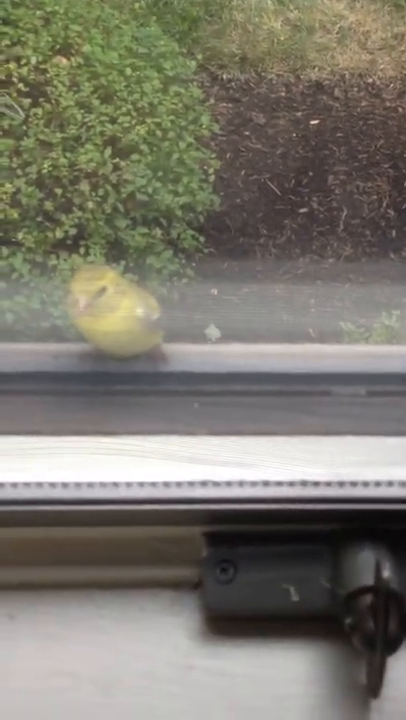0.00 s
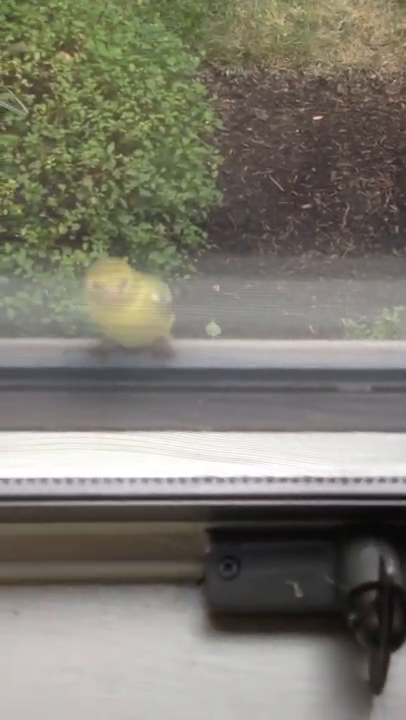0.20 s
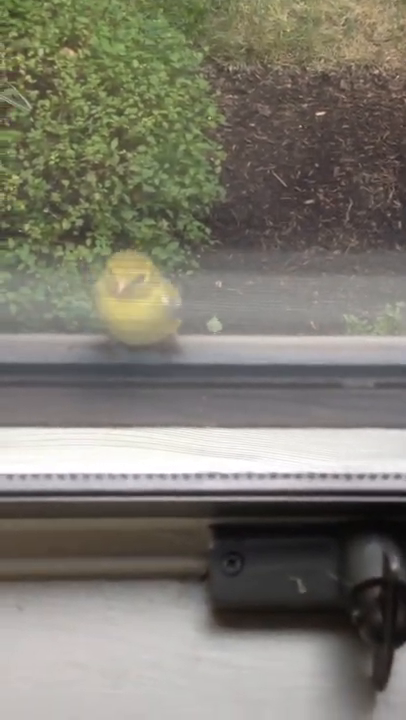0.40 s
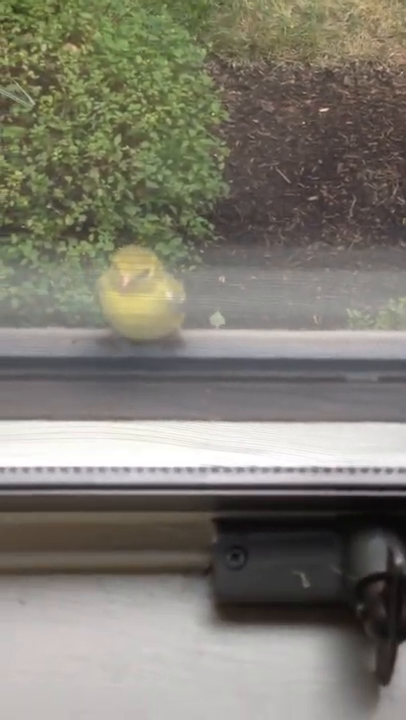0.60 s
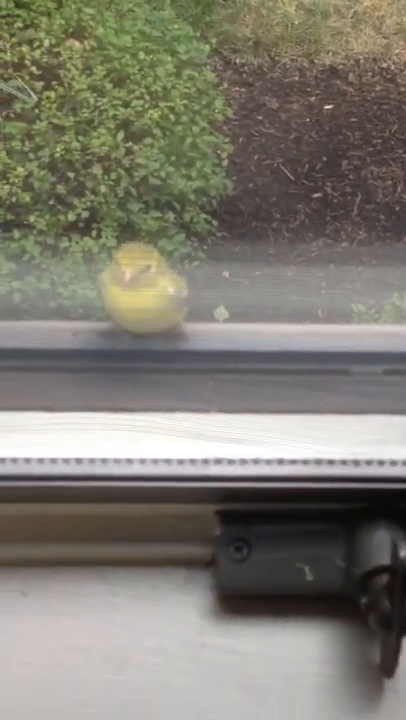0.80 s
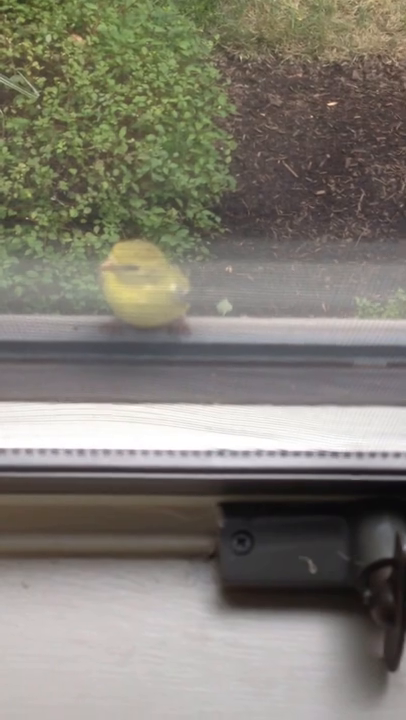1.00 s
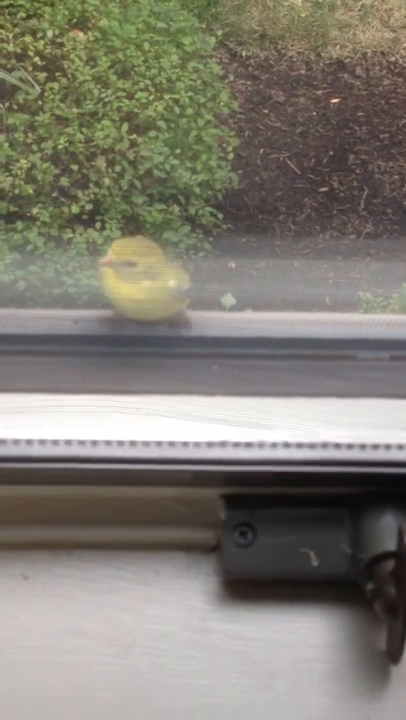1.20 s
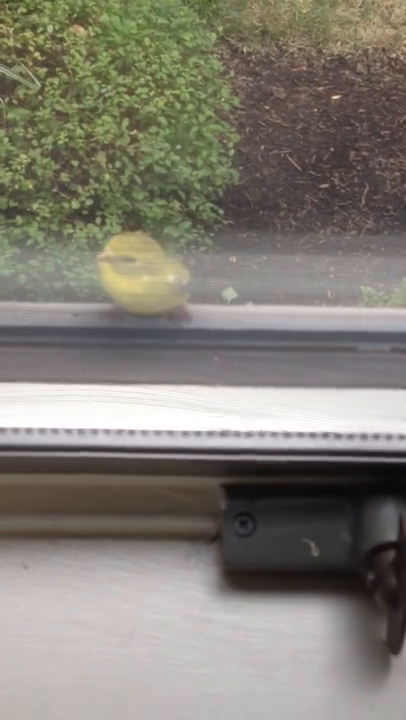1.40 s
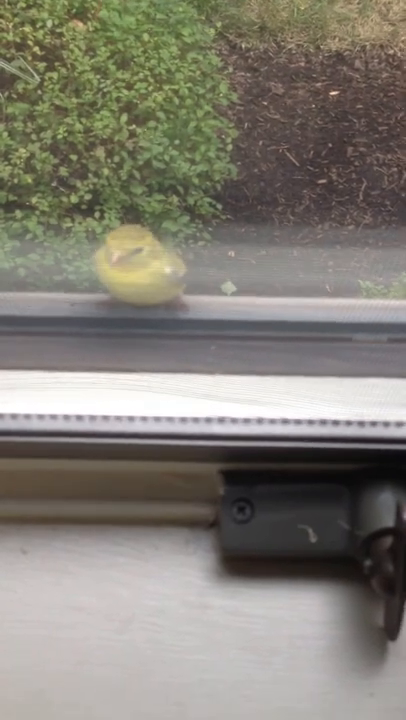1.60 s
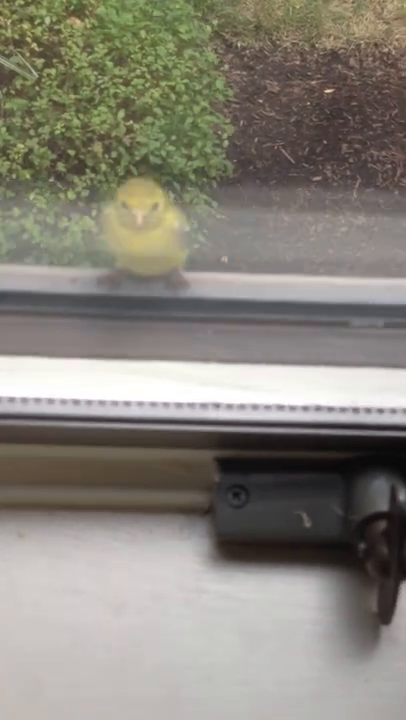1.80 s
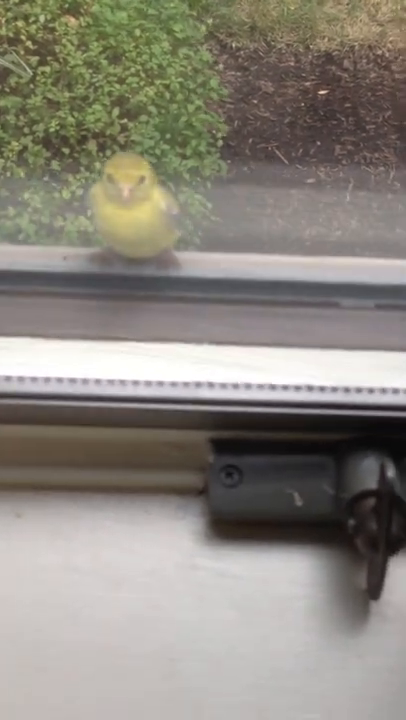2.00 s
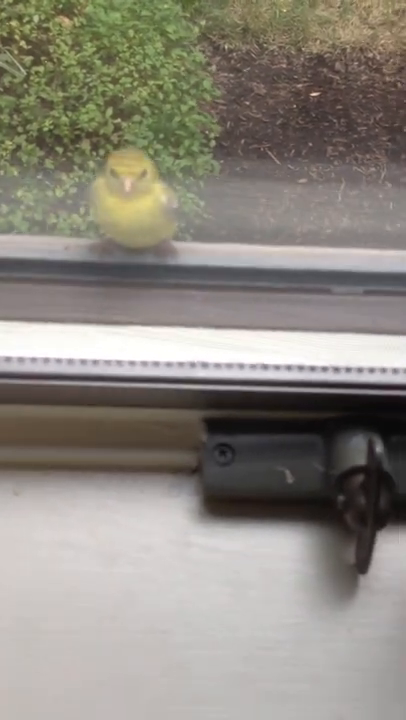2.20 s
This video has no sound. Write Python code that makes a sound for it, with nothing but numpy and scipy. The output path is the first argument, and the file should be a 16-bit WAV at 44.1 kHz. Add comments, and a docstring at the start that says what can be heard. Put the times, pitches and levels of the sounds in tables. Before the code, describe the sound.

A small bird's beak raps on window glass, heard close from inside: two faint touches, four hard rapid pecks, a soft dull knock, then over a second of quiet room rumble before a second short burst.

```python
"""Pecks on a window pane

Two quick bursts of sharp taps indoors, most likely a small bird at the glass: light touches, then hard pecks.
Each peck sends bending waves through the pane (treble first, so they chirp downwards) and leaves it ringing.
One soft, dull knock follows the first burst. A wall throws the sounds back; the quiet room rumbles and hisses."""
import sys
import numpy as np
from scipy import signal
from scipy.fft import rfft, irfft
from scipy.io import wavfile

SR = 44100
rng = np.random.default_rng(int(sys.argv[2]) if len(sys.argv) > 2 else 0)


def write(x):
    x = np.atleast_2d(x).T
    wavfile.write(sys.argv[1], SR, np.round(np.clip(x, -1, 1) * 32767).astype(np.int16))


N = 101430
RING_T = np.arange(int(0.48 * SR)) / SR   # time since a blow, s


def from_db(db):
    """Turn decibels into an amplitude factor."""
    return 10 ** (np.asarray(db) / 20)


def at_hz(points, hz):
    """Read a table on a log-frequency axis."""
    f, value = np.transpose(points)
    return np.interp(np.log(np.maximum(hz, 1)), np.log(f), value)


def bins(size):
    """Frequencies of a real spectrum, in Hz."""
    return np.arange(size // 2 + 1) * SR / size


def noise(density, size):
    """Random-phase noise of the given amplitude per root Hz."""
    phases = np.exp(2j * np.pi * rng.random(size // 2 + 1))
    return irfft(density * phases, size) * np.sqrt(size * SR / 2)


def low_pass(x, hz):
    """Roll off the treble at 12 dB per octave."""
    return signal.sosfilt(signal.butter(2, min(hz, SR / 2 - 1), fs=SR, output="sos"), x)


def add(out, s, sound):
    """Mix a sound in at a time in seconds."""
    i = int(s * SR)
    out[i:i + len(sound)] += sound[:len(out) - i]


# The pecks in order: [t/s, then level/dB in each contact register: thud, ring, clack, crack, snap, tick, top]
PECK_HITS = [(0.1706, -8, -26.5, -18, -14, -24, -27, -24), (0.198, -11, -21.5, -20, -16, -19.5, -24, -24),
             (.2408, 4, 0.5, -1, 2.5, -1.5, -3.5, -7), (0.2736, 4, 0, -1, -4.5, -1, 2, 0),
             (0.303, 1.5, 3, 2, 3.5, 1, 1.5, 4), (.335, 0.5, 0, -1, -3, -12, -1, 4),
             (1.7125, -11, -20, -17.5, -8.5, -16.5, -31, -20),
             (1.7603, -6.5, -20, -17.5, -18.5, -26, -26, -21),
             (1.7868, -6.5, -17, -14, -13, -14.5, -24, -14), (1.821, 5, 1, -2, -2, 6.5, -14.5, 4)]


def pecks():
    """Every peck strikes nearly the same spot of the same pane, with its own force and hardness."""
    out = np.zeros(N)
    waves = bending_waves()
    for (s, *register_db), ring in zip(PECK_HITS, dense_rings()):
        tap = waves + ring + strong_modes()
        add(out, s, contact(tap, register_db))
    return out


# Centres of the contact registers, thud to top: [f/Hz]
REGISTER_HZ = [400, 1100, 2300, 5000, 7800, 12000, 14000]


def contact(sound, register_db):
    """Force and hardness of the beak's contact colour the tap; minimum phase, so nothing sounds early."""
    size = len(sound)
    gain_db = at_hz(list(zip(REGISTER_HZ, register_db)), bins(size))
    log_gain = np.log(from_db(gain_db))
    # folding the cepstrum onto positive times gives the minimum phase
    cepstrum = irfft(log_gain, size) * (1 + np.sign(np.fft.fftfreq(size)))
    return irfft(rfft(sound) * np.exp(rfft(cepstrum)), size)


# Routes of the bending waves, direct and back from the frame: [distance/m, level/dB before losses on the way]
WAVE_PATHS = [(.15, -2), (1.2, -2.5), (3.2, 1.5), (4.4, -13)]
# Colour of what the waves radiate, before the contact: [f/Hz, level/dB]
WAVE_RADIATION = [(120, -63.5), (430, -47), (780, -46), (1080, -81.5), (1600, -52), (2150, -46),
                  (2600, -58.5), (3400, -56), (5500, -52), (8500, -59.5), (10200, -72.5), (12500, -62),
                  (15000, -76)]
# Time the glass takes to lose 60 dB, for the waves and the dense modes: [f/Hz, t60/s]
GLASS_DECAY = [(150, 0.26), (400, 0.19), (1100, 0.22), (2200, 0.1), (4500, 0.065), (8000, 0.044),
               (14000, 0.067)]
WAVE_M_PER_S_AT_1K = 338   # speed at which the wave's energy travels


def bending_waves():
    """The first click and its returns from the frame; wave speed grows with the root of frequency."""
    f = bins(len(RING_T)) + 1   # 1 Hz up, to avoid a zero speed
    speed = WAVE_M_PER_S_AT_1K * np.sqrt(f / 1000)
    t60 = at_hz(GLASS_DECAY, f)
    waves = 0
    for metres, db in WAVE_PATHS:
        travel_s = metres / speed
        # twice the usual phase: at root-of-frequency speed this delays each band by travel_s
        waves = waves + from_db(db - 60 * travel_s / t60) * np.exp(-4j * np.pi * f * travel_s)
    spectrum = waves * from_db(at_hz(WAVE_RADIATION, f))
    clicks = irfft(spectrum, len(RING_T)) * np.sqrt(SR / 2)
    return clicks * (RING_T < RING_T[-1] / 2)   # drop what wraps round to the end


# Strongest modes of the pane, before strike variation and contact: [f/Hz, level/dB, t60/s]
CLEAR_TONES = [(338.5, -49, 0.27), (437, -40.5, 0.16), (468.3, -41, .22), (517, -52.5, 0.28),
               (576.6, -49.5, 0.37), (627.5, -49, 0.3), (685.7, -41.5, .16), (712, -47, .4),
               (878.4, -42.5, 0.22), (972, -45, 0.24), (1035.7, -37.5, .17), (1090, -38, 0.17),
               (1092.5, -38.5, 0.22), (1206, -42, 0.23), (1374, -48, 0.21), (1439, -38, 0.14),
               (1510, -41, 0.17), (1550, -45.5, 0.1), (1976, -37.5, .07), (2114, -40.5, 0.16),
               (2276, -31.5, 0.053), (2520, -65, 0.064), (2844, -47.5, 0.072), (5535, -38, 0.032)]


def strong_modes():
    """The clear tones of the pane are decaying sines, struck a little differently each time."""
    variation_db = rng.normal(0, 0.5, len(CLEAR_TONES))
    out = np.zeros(len(RING_T))
    for k, (hz, db, t60) in enumerate(CLEAR_TONES):
        envelope = from_db(db + variation_db[k] - 60 * RING_T / t60)
        out += (-1) ** k * envelope * np.sin(2 * np.pi * hz * RING_T)   # polarity alternates
    return out


# Dense modes between the clear tones, before build-up and contact: [f/Hz, level/dB per Hz]
DENSE_COLOUR = [(100, -71), (260, -78), (400, -67.5), (800, -69.5), (1400, -62.5), (1780, -70.5),
                (2200, -66.5), (3100, -69), (4000, -74), (5400, -70.5), (6300, -70.5), (8600, -70.5),
                (10200, -89), (12300, -81), (15000, -88)]
MODE_SPACING_HZ = 24
SAME_SPOT = 0.8   # share of the ringing's energy that all pecks have in common
BUILD_S_AT_1K = 0.005   # time constant of the build-up, shorter in the treble


def dense_rings():
    """A plate's crowd of nearly evenly spaced modes builds up and dies away; one row of ringing per peck."""
    slots = np.arange(4, 16000 // MODE_SPACING_HZ)
    hz = (slots + rng.uniform(-0.4, 0.4, len(slots))) * MODE_SPACING_HZ
    common = np.sqrt(SAME_SPOT) * rng.choice([-1, 1], len(hz))
    own = np.sqrt(1 - SAME_SPOT) * rng.standard_normal((len(PECK_HITS), len(hz)))
    strengths = (common + own) * from_db(at_hz(DENSE_COLOUR, hz)) * np.sqrt(2 * MODE_SPACING_HZ)
    t = RING_T.astype(np.float32)
    turn = np.float32(2 * np.pi * hz)[:, None]
    loss = np.float32(np.log(1000) / at_hz(GLASS_DECAY, hz))[:, None]
    build = np.float32(hz / 1000 / BUILD_S_AT_1K)[:, None]
    # exponents stop at 30, far below hearing
    decay = np.exp(-np.minimum(loss * t, 30))
    rise = 1 - np.exp(-np.minimum(build * t, 30))
    modes = np.sin(turn * t) * decay * rise
    return np.float32(strengths) @ modes


KNOCK_S, KNOCK_HZ, KNOCK_DB, KNOCK_RISE_S = 0.372, 495, -35.5, 0.0024   # level at the envelope's peak


def knock():
    """A soft push: a few low sine cycles swell and fade, with no crack."""
    out = np.zeros(N)
    age = RING_T / KNOCK_RISE_S
    envelope = from_db(KNOCK_DB) * age * np.exp(1 - age)
    add(out, KNOCK_S, envelope * np.sin(2 * np.pi * KNOCK_HZ * RING_T))
    return out


# levels are before each low-pass
WALL_ECHO_S, WALL_ECHO_DB, WALL_CUT_HZ = 0.0076, -9, 2760
ROOM_DB, ROOM_T60_S, ROOM_CUT_HZ = -19, 0.7, 1260
ROOM_TREBLE_DB, ROOM_TREBLE_T60_S, ROOM_TREBLE_CUT_HZ = -18, 0.35, 7400


def room(x):
    """One near wall echoes, then a tail follows whose treble dies first."""
    out = x.copy()
    echo = from_db(WALL_ECHO_DB) * low_pass(x, WALL_CUT_HZ)
    long_tail = low_pass(room_tail(x, ROOM_DB, ROOM_T60_S), ROOM_CUT_HZ)
    bright_tail = low_pass(room_tail(x, ROOM_TREBLE_DB, ROOM_TREBLE_T60_S), ROOM_TREBLE_CUT_HZ)
    for reflection in (echo, long_tail, bright_tail):
        add(out, WALL_ECHO_S, reflection)
    return out


def room_tail(x, level_db, t60):
    """Diffuse reflections die away like fading noise of unit energy, scaled to the level."""
    tail = rng.standard_normal(len(RING_T)) * from_db(-60 * RING_T / t60)
    return from_db(level_db) * signal.fftconvolve(x, tail / np.linalg.norm(tail))


# Colour of the room background, before the trim: [f/Hz, level/dB per Hz]
ROOM_AIR = [(25, -104), (55, -99), (85, -96.5), (112, -80), (170, -83), (260, -89), (430, -88.5),
            (700, -100.5), (1100, -104), (2500, -108), (5000, -108), (7500, -111), (10000, -117),
            (13000, -111), (15500, -112)]
AIR_TRIM_DB = -0.5


def background():
    """Steady low room rumble and faint hiss, as one shaped noise."""
    return noise(from_db(at_hz(ROOM_AIR, bins(N)) + AIR_TRIM_DB), N)


def scene():
    """Pecks and knock sound in the room, over its background."""
    return (room(pecks() + knock()) + background())[None]


LOW_CUT_HZ, TOP_CUT_HZ = 70, 15300


def record(dry):
    """The small microphone loses the deep bass; the top is cut steeply."""
    thin = signal.sosfilt(signal.butter(2, LOW_CUT_HZ, "high", fs=SR, output="sos"), dry)
    return signal.sosfilt(signal.ellip(10, 0.2, 70, TOP_CUT_HZ, fs=SR, output="sos"), thin)


dry = scene()
out = record(dry)
write(out)
```